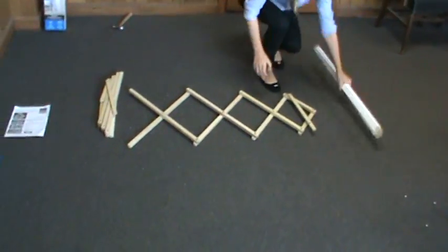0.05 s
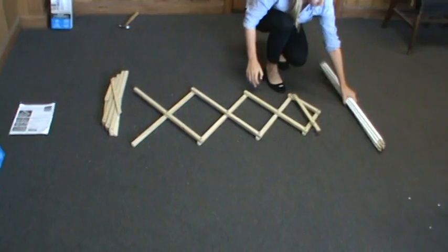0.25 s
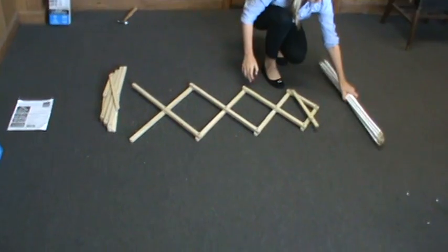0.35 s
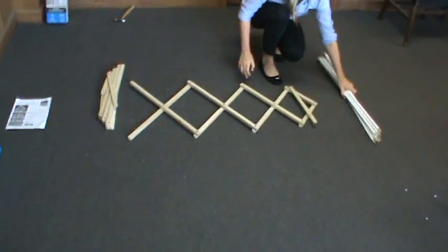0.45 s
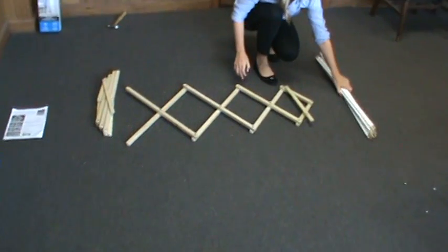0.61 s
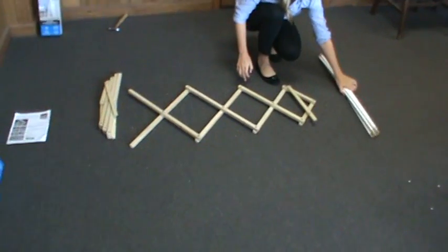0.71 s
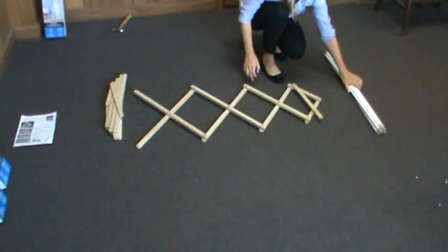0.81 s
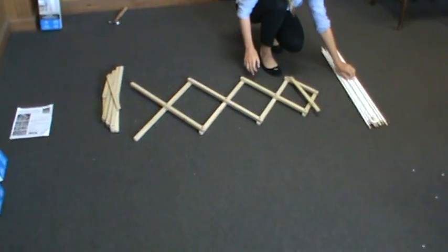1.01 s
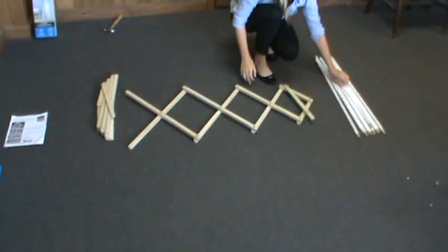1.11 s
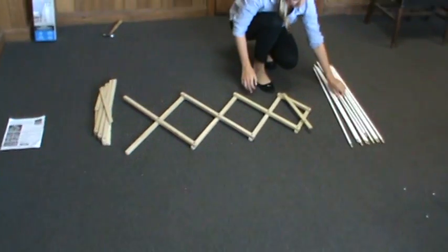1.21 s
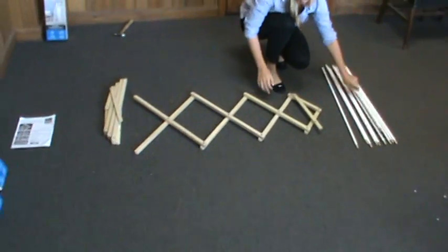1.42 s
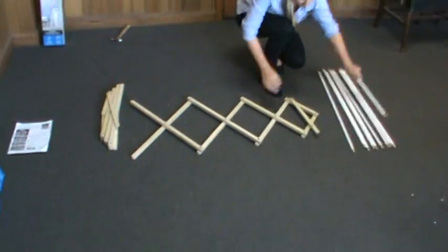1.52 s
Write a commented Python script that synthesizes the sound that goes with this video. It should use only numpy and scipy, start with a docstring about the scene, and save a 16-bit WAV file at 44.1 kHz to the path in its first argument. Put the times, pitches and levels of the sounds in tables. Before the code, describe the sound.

A bundle of wooden rods rattles and clacks, laid on a carpeted floor and fanned out.

```python
"""Wooden dowels on carpet

A bundle of long dowels is set down and spread by hand in a small humming room; a sleeve swishes first.
Each clack is a flurry of contacts ringing the bending modes of a few rods, damped until the hand lets go.
Tips click, rods slide, ends knock on the floor, the bundle thumps down and the last loose rods ring out."""
import sys
import numpy as np
from scipy import signal
from scipy.fft import rfft, irfft, next_fast_len
from scipy.io import wavfile
from scipy.ndimage import uniform_filter1d, map_coordinates

SR = 44100
rng = np.random.default_rng(int(sys.argv[2]) if len(sys.argv) > 2 else 0)


def put_to_file(sound):
    """Save the sound as 16-bit audio at rate SR, in the file named by the first command-line argument."""
    columns = np.atleast_2d(sound).T  # one column per channel
    safe = np.clip(columns, -1, 1)
    whole_steps = np.round(safe * 32767)
    wavfile.write(sys.argv[1], SR, whole_steps.astype(np.int16))


N = 68355

# Spectra. Each row: frequency in Hz, gain in dB.
VENT_SPECTRUM = [(20, -10), (48, 1), (70, -0.5), (100, -3), (170, -2), (300, -7.5), (600, -9.5),
                 (1000, -13), (2000, -26), (4000, -28), (8000, -34.5), (12000, -35.5), (16000, -45)]
SLEEVE_SPECTRUM = [(300, -12), (1500, 1), (4000, -4), (9000, 1), (15000, -11)]
WOOD_SPECTRUM = [(150, -30), (400, -31.5), (700, -17), (1200, -9), (1800, 1), (3000, 1.5), (4500, 1.5),
                 (6500, -3), (8500, -10), (11000, -22.5), (15500, -45)]
SCRAPE_SPECTRUM = [(300, -19.5), (1100, -9), (2000, 7), (5500, -5), (9000, -12.5), (15500, -36)]
KNOCK_SPECTRUM = [(200, -14), (500, -13.5), (750, 1.5), (1000, 1), (1400, 0), (2200, -23), (6000, -42)]
CARPET_SPECTRUM = [(30, -22), (60, 4), (130, -11.5), (230, 4.5), (320, 1.5), (480, 1.5), (700, -8.5),
                   (950, -7), (1600, -24), (5000, -47)]
# Friction strokes. Each row: start in seconds, length in seconds, level in dB.
SLEEVE_STROKES = [(-.05, 0.45, -55.5)]
ROD_SLIDES = [(.335, 0.049, -30.5), (.672, 0.12, -25.5), (.924, 0.277, -30)]
# Rod on rod. Each row: start in seconds, level in dB, brightness in dB per octave,
# flurry length in seconds, main partial in Hz, its prominence in dB.
CLACKS = [ (0.214, -33, 2.5, 0.0048, 3890, 3), (0.2184, -29.5, 9.5, 0.0055, 4210, 3),
          (.333, -27, 1.5, 0.0046, 4850, 3), (0.341, -27.5, -4.5, 0.015, 1433, -2.5),
          (0.3576, -18.5, 3.5, 0.0083, 4115, 1.5), (0.372, -20.5, -1, 0.015, 1783, -1),
          (0.388, -29, -6, 0.0078, 1820, 13), (0.409, -32, -4, 0.011, 2690, 1),
          (0.5038, -24.5, 6.5, 0.0037, 4086, -12), (0.5128, -15.5, 8.5, 0.01, 5670, 4),
          (0.517, -19.5, -5.5, 0.0075, 2832, 6.5), (0.528, -21.5, -0.5, 0.014, 4253, 0),
          (0.549, -20, 2, 0.0073, 4092, -3), (0.5912, -23.5, -2, 0.0083, 4120, -1),
          (0.631, -25.5, -3.5, 0.012, 2776, 0), (0.664, -27, -2, 0.006, 2094, 2),
          (0.6724, -13.5, -0.5, 0.0064, 2118, 2), (0.682, -15.5, -1.5, 0.012, 3685, 4.5),
          (0.704, -12.5, -0.5, 0.018, 2750, 1), (0.722, -13.5, 1, 0.012, 3424, 0.5),
          (0.738, -13, 0.5, 0.0061, 1915, -7), (0.759, -18.5, 2.5, 0.01, 3524, 5),
          (.772, -20.5, 4.5, 0.0087, 2240, 1), (0.7874, -16.5, -3.5, 0.0046, 3990, 5.5),
          (0.814, -26.5, -0.5, 0.049, 1400, 1), (0.871, -19.5, 0.5, 0.012, 3830, 1),
          (0.891, -23, -5.5, 0.023, 2815, -1), (0.9209, -17, 5.5, 0.0088, 4950, -5),
          (0.933, -17, 3.5, 0.01, 6925, -2.5), (0.944, -15, 4, 0.0067, 3746, 8.5),
          (0.955, -15, -2.5, 0.02, 2690, 0), (0.973, -20.5, 5, 0.0063, 1800, 6),
          (0.983, -23, -7, 0.021, 2330, 3), (0.991, -15.5, 1, 0.022, 3636, -7),
          (1.008, -24, -5, 0.0074, 2493, -2), (1.03, -19, 2.5, 0.0064, 2360, 9),
          (1.0405, -17.5, 10, 0.0057, 5790, 4), (1.046, -16.5, 0, 0.0058, 3410, 5),
          (1.053, -17, 0.5, 0.0091, 4620, 3), (1.065, -17, -0.5, 0.0052, 2794, 1.5),
          (1.102, -17, -0.5, 0.0048, 5794, 3.5), (1.109, -18.5, 0, 0.0067, 2803, 10),
          (1.120, -18.5, -2, 0.015, 3376, 3), (1.136, -15.5, 6, 0.0092, 4147, 8.5),
          (1.138, -22.5, 8, 0.006, 5880, 11), (1.152, -27, -9, 0.0095, 2100, 8),
          (1.191, -28, 14, 0.0028, 5940, 10), (1.192, -21.5, 1, 0.0038, 4150, 19),
          (1.193, -27.5, 7, 0.0035, 3634, 16), (1.243, -24.5, -4, 0.013, 2815, 7),
          (1.2472, -25, 5, 0.0037, 3810, 5), (1.272, -29.5, -5.5, .012, 3284, 7.5),
          (1.317, -29, -4.5, 0.006, 2285, 6), (1.318, -32, -5, 0.003, 3860, 8),
          (1.325, -44, -9, 0.0022, 1828, 10)]
# Modes of a rod end. Each row: frequency in Hz, level in dB.
TIP_MODES = [(2280, -18), (4100, -5.5), (5065, -1.5), (5950, -1), (7500, -9), (12000, -24)]
# Single impacts. Each row: start in seconds, level in dB.
TIP_CLICKS = [(0.2196, -26.5), (0.2225, -26.5), (0.5095, -18.5), (1.044, -28), (1.193, -35), (1.319, -39),
              (1.373, -44)]
END_KNOCKS = [(.362, -40), (0.385, -33), (.512, -37), (.550, -33), (.678, -34), (.716, -31), (.768, -29.5),
              (1.162, -39)]
CARPET_THUMPS = [(0.384, -40), (.432, -38.5), (0.677, -37.5), (0.751, -41), (.795, -37), (1.162, -24.5),
                 (1.194, -43), (1.203, -36.5)]
# Room decay. Each row: frequency in Hz, T60 in seconds.
ROOM_DECAY = [(200, 0.41), (1300, 0.41), (3500, 0.28), (9000, 0.2), (15000, 0.45)]
# Stereo width. Each row: frequency in Hz, side gain in dB.
VENT_WIDTH = [(40, -34), (150, -22), (500, -12.5), (2000, -4), (8000, -5.5)]
ROOM_WIDTH = [(100, -7.5), (500, -7.5), (1500, -10.5), (3000, -9), (6000, -4), (10000, -2.5)]
# Stereo balance. Each row: frequency in Hz, left minus right in dB.
BALANCE = [(600, -0.8), (1400, 1), (2800, -1.7), (5500, -0.5), (12000, 0.5)]

LET_GO_S = 1.193
HELD_T60_S, FREE_T60_S, NEIGHBOUR_T60_S = 0.034, 0.11, 0.061  # at 3 kHz


def amp(db):
    """Decibels to gain."""
    return 10 ** (np.asarray(db) / 20)


def unit(x):
    """Scale to energy 1."""
    return x / np.sqrt(np.sum(x ** 2) + 1e-20)


def along(points, hz):
    """Interpolate (Hz, value) rows on a log axis."""
    freqs, values = np.transpose(points)
    return np.interp(np.log(hz + 1), np.log(freqs + 1), values)


def fade(t, t60_s):
    """Exponential decay."""
    return np.exp(-np.log(1000) * t / t60_s)


def filtered(x, gain):
    """Zero-phase filter by gain(hz)."""
    size = next_fast_len(N + SR // 2)
    return irfft(rfft(x, size) * gain(np.fft.rfftfreq(size, 1 / SR)), size)[..., :N]


def shaped(noise, spectrum):
    """Noise filtered to a spectrum, RMS 1."""
    return np.sqrt(N) * unit(filtered(noise, lambda hz: amp(along(spectrum, hz))))


def coloured(x, colour_db):
    """Minimum-phase filter for a short sound."""
    n = len(x)
    cepstrum = irfft(np.log(amp(colour_db(np.fft.rfftfreq(n, 1 / SR)))), n)
    cepstrum[1:n // 2] *= 2
    cepstrum[n // 2 + 1:] = 0
    return irfft(rfft(x) * np.exp(rfft(cepstrum)), n)


def widen(mid, side, width):
    """Mid and side to left and right."""
    side = filtered(side, lambda hz: amp(along(width, hz)))
    return np.array([mid + side, mid - side])


def place(start_s, db, sound):
    """Track holding one sound; db is its energy spread over 10 ms."""
    track = np.zeros(N)
    part = track[round(start_s * SR):][:len(sound)]
    part += amp(db) * np.sqrt(SR / 100) * unit(sound)[:len(part)]
    return track


def burst(spectrum, t60_s, length_s=0.2):
    """Contact without ring: decaying coloured noise."""
    t = np.arange(round(length_s * SR)) / SR
    return coloured(rng.standard_normal(len(t)) * fade(t, t60_s), lambda hz: along(spectrum, hz))


def room_tone(vent_db=-41.5, hum_hz=119.6, hum_db=-47, waver_db=2.5):
    """Ventilation rumble, faint hiss and a wavering hum."""
    t = np.arange(N) / SR
    mid, side = [shaped(rng.standard_normal(N), VENT_SPECTRUM) for _ in range(2)]
    waver = map_coordinates(rng.standard_normal(20), [10 * t])
    hum = amp(waver_db * waver) * np.sqrt(2) * np.sin(2 * np.pi * hum_hz * t)
    return amp(vent_db) * widen(mid, side, VENT_WIDTH) + amp(hum_db) * hum


def friction(strokes, spectrum, slips_per_s=5000):
    """Dense tiny slips that swell and fade with each stroke."""
    t = np.arange(N) / SR
    slips = rng.standard_normal(N) * (rng.random(N) < slips_per_s / SR)
    envelope = np.zeros(N)
    for start_s, length_s, db in strokes:
        progress = np.clip((t - start_s) / length_s, 0, 1)
        envelope += amp(db) * np.sqrt(np.sin(np.pi * progress).clip(0))
    return shaped(slips, spectrum) * envelope


def sleeve_swish():
    """The sleeve rubs as the arm swings down."""
    return friction(SLEEVE_STROKES, SLEEVE_SPECTRUM)


def ring_time(hz, t60_s):
    """Mode T60 from the T60 at 3 kHz; higher modes die sooner."""
    return t60_s * (3000 / hz) ** 0.48


def rod(t, partial_hz, t60_s, count=22, scatter_db=3):
    """Free-rod bending modes, rising as (2n + 1) squared, tuned to put one at partial_hz."""
    untuned = 55.82 * ((2 * np.arange(2, count + 2) + 1) / 3) ** 2
    hz = untuned * partial_hz / untuned[np.argmin(abs(untuned - partial_hz))]
    life_s = ring_time(hz, t60_s)
    weights = amp(scatter_db * rng.standard_normal(count)) * rng.choice([-1, 1], count) / np.sqrt(life_s)
    modes = np.sin(2 * np.pi * hz[:, None] * t) * fade(t, life_s[:, None])
    return unit(weights @ modes)


def flurry(ring, length_s, count=36, contacts_per_s=1500, scatter_db=2.5, swell_s=0.0018):
    """Chatter: a quick uneven run of contacts strikes the ring."""
    gaps = rng.uniform(0.2, 1.8, count)
    times_s = (np.cumsum(gaps) - gaps[0] / 2) / contacts_per_s
    force = amp(scatter_db * rng.standard_normal(count)) * rng.choice([-1, 1], count)
    envelope = (1 - np.exp(-times_s / swell_s)) / (1 + (times_s / length_s) ** 8)
    impulses = np.bincount((times_s * SR).astype(int), force * envelope)
    return unit(signal.fftconvolve(ring, impulses)[:len(ring)])


def clacks(pitch_spread=0.0906, crack_db=1.5, crack_t60_s=0.0087, linewidth_hz=9.3):
    """A rod hits three neighbours. Returns bodies (modes plus contact crack) and main partials."""
    bodies, partials = np.zeros((2, N))
    t = np.arange(SR // 5) / SR
    for start_s, db, tilt_db_per_oct, length_s, partial_hz, prominence_db in CLACKS:
        t60_s = HELD_T60_S if start_s < LET_GO_S else FREE_T60_S
        neighbours_hz = partial_hz * np.exp(pitch_spread * rng.standard_normal(3))
        rings = [rod(t, partial_hz, t60_s)] + [rod(t, hz, NEIGHBOUR_T60_S) for hz in neighbours_hz]
        wood = unit(sum(flurry(ring, length_s) for ring in rings))
        crack = flurry(rng.standard_normal(len(t)) * fade(t, crack_t60_s), length_s)
        colour_db = lambda hz: along(WOOD_SPECTRUM, hz) + tilt_db_per_oct * np.log2(hz.clip(1520, 8250))
        body = unit(coloured(wood + amp(crack_db) * crack, colour_db))
        # Touching rods blur the partial.
        drift_rad = np.cumsum(rng.standard_normal(len(t))) * np.sqrt(2 * np.pi * linewidth_hz / SR)
        envelope = fade(t, ring_time(partial_hz, t60_s)) * (1 - fade(t, 2 * length_s))
        partial = np.sin(2 * np.pi * partial_hz * t + drift_rad) * envelope
        over_body_db = prominence_db - 6.5
        body_db = db - 10 * np.log10(1 + amp(over_body_db) ** 2)  # both share the clack's energy
        bodies += place(start_s, body_db, body)
        partials += place(start_s, body_db + over_body_db, partial)
    return bodies, partials


def tip_clicks(ring_t60_s=0.012, crack_db=-10):
    """Hard tips meet in dry clicks that briefly ring the rod ends."""
    track = np.zeros(N)
    t = np.arange(SR // 10) / SR
    for start_s, db in TIP_CLICKS:
        modes = sum(amp(mode_db) * rng.choice([-1, 1]) * np.sin(2 * np.pi * hz * t)
                    for hz, mode_db in TIP_MODES)
        ring = unit(modes * fade(t, ring_t60_s))
        crack = unit(burst(SCRAPE_SPECTRUM, t60_s=0.011, length_s=0.1))
        track += place(start_s, db, ring + amp(crack_db) * crack)
    return track


def rod_slides():
    """Rods scrape over each other."""
    return friction(ROD_SLIDES, SCRAPE_SPECTRUM)


def end_knocks():
    """The gripped bundle lands on its ends and answers as one hollow piece of wood."""
    return sum(place(start_s, db, burst(KNOCK_SPECTRUM, t60_s=0.071)) for start_s, db in END_KNOCKS)


def carpet_thumps():
    """The carpet stops the rods with short, dull pushes."""
    return sum(place(start_s, db, burst(CARPET_SPECTRUM, t60_s=0.018)) for start_s, db in CARPET_THUMPS)


def floor_boom(start_s=1.17, db=-37, hz=50.8, t60_s=0.36, rise_s=0.11):
    """The floor gives under the bundle and swings in one low mode."""
    t = np.arange(SR // 2) / SR
    envelope = fade(t, t60_s) * (1 - fade(t, rise_s)) ** 2
    return place(start_s, db, np.sin(2 * np.pi * hz * t) * envelope)


def room_echo(x, db=-0.5, delay_s=0.004, segments=12):
    """Wall reflections; the rods move, so each time segment gets its own tail."""
    delayed = np.pad(x, (round(delay_s * SR), 0))[:N]
    mid_side = np.zeros((2, N + SR))
    edges = np.linspace(0, N, segments + 1).astype(int)
    for start, end in zip(edges, edges[1:]):
        hz, t, noise = signal.stft(rng.standard_normal((2, SR // 2)), SR, nperseg=256)
        _, tails = signal.istft(noise * fade(t, along(ROOM_DECAY, hz)[:, None]), SR, nperseg=256)
        crossfade = np.interp(np.arange(N), [start - 128, start + 128, end - 128, end + 128], [0, 1, 1, 0])
        first = max(start - 128, 0)
        segment = (delayed * crossfade)[first:end + 128]
        for channel, tail in zip(mid_side, tails):
            echo = signal.fftconvolve(segment, unit(tail))
            channel[first:first + len(echo)] += echo
    return amp(db) * widen(*mid_side[:, :N], ROOM_WIDTH)


def scene(clear_send_db=-8):
    """Dowels, echo, sleeve and room tone; partials and clicks reach the walls more weakly."""
    bodies, partials = clacks()
    rods = bodies + rod_slides() + carpet_thumps() + floor_boom() + end_knocks()
    clear = partials + tip_clicks()
    heard = rods + clear + room_echo(rods + amp(clear_send_db) * clear)
    panned = filtered(heard, lambda hz: amp(np.outer([0.5, -0.5], along(BALANCE, hz))))
    return panned + sleeve_swish() + room_tone()


def record(dry, knee_db=-13.5, slope=0.34, release_s=0.15, cutoff_hz=15800):
    """Gain control, fast to duck and slow to recover, then a low-pass."""
    power = np.abs(uniform_filter1d(np.mean(dry ** 2, axis=0), size=256))
    recovery = np.exp(-np.arange(N) / SR / release_s)
    held_power = np.maximum.accumulate(power / recovery) * recovery
    gain = (1 + held_power / amp(knee_db) ** 2) ** -slope
    return filtered(dry * gain, lambda hz: hz < cutoff_hz)


dry = scene()
out = record(dry)
put_to_file(out)
```